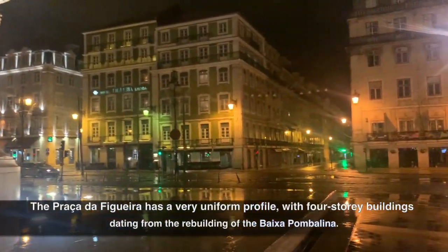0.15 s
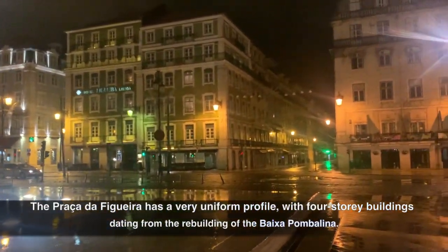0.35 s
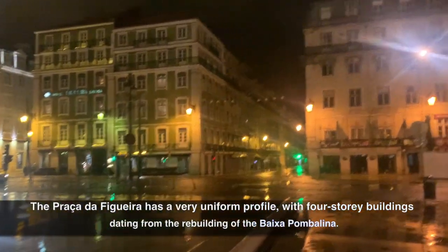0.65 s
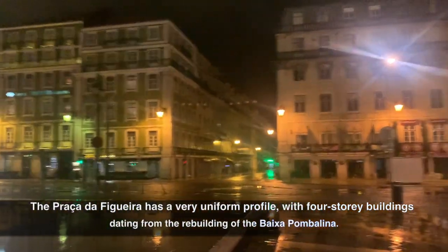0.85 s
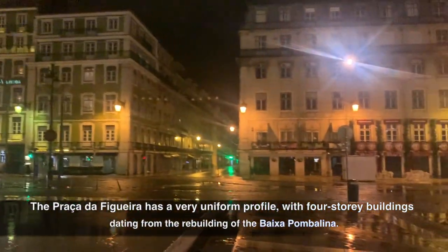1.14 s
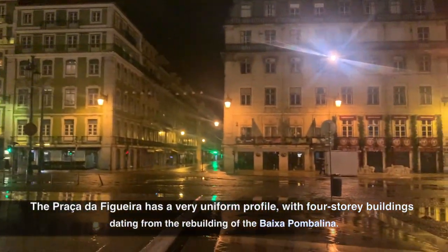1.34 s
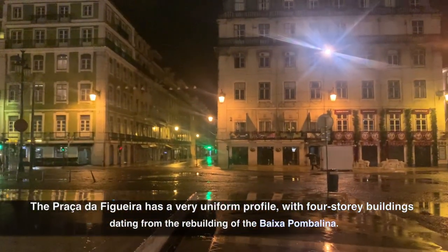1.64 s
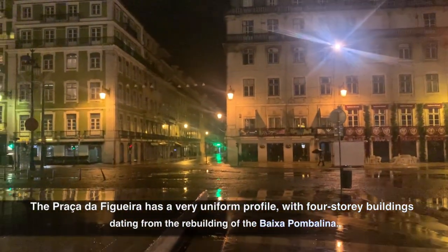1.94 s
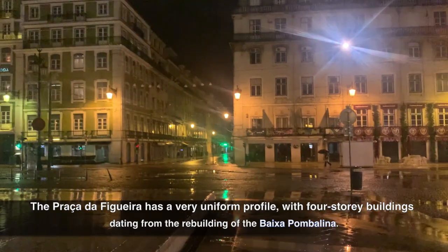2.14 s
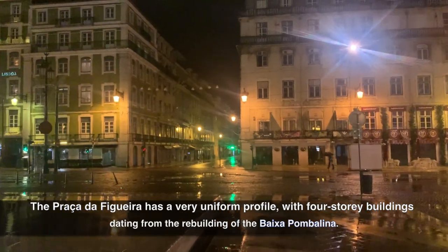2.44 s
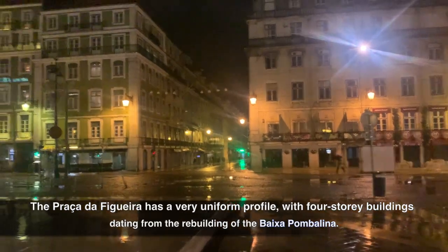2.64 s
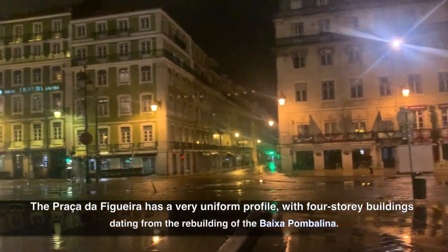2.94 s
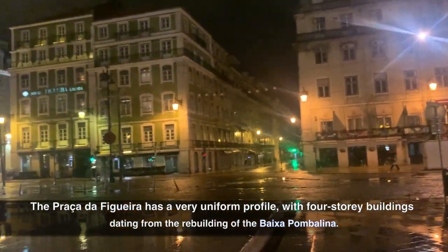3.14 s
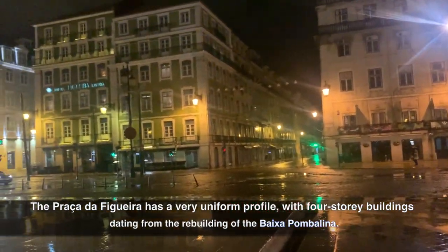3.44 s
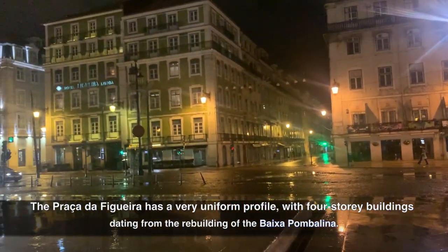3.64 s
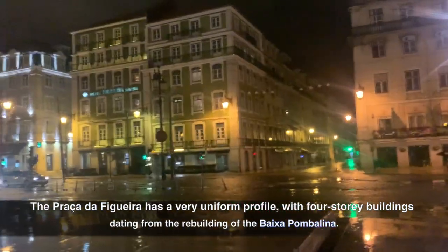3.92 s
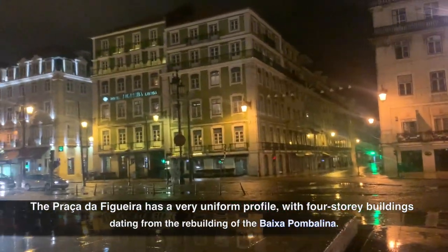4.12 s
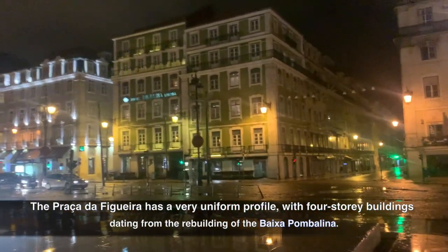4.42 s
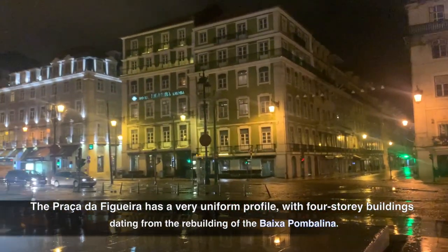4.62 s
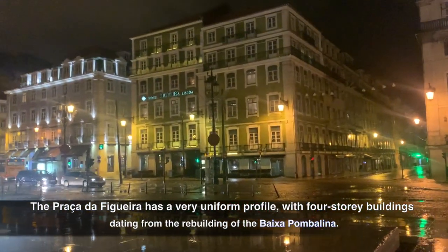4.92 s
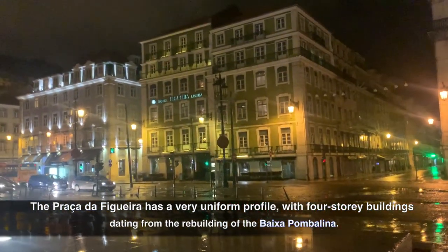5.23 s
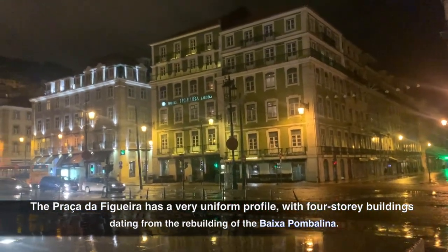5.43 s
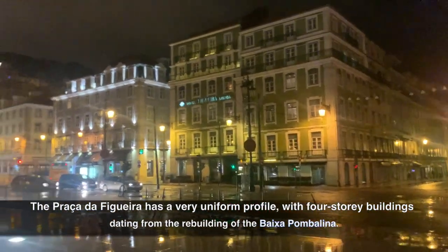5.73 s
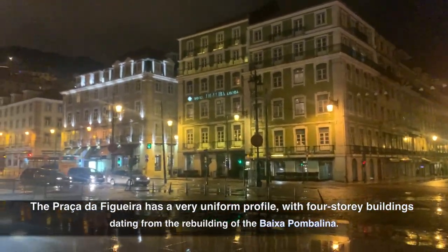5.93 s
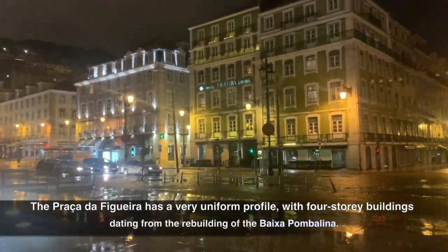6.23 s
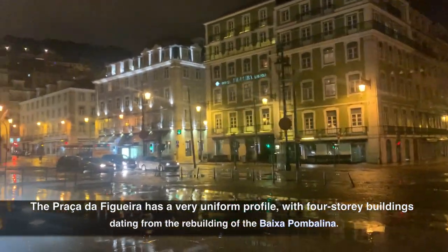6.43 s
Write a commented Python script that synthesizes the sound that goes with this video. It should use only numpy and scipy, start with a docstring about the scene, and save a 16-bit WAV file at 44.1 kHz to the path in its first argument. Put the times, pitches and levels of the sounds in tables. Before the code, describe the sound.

An open, wet square at night: distant engines drone low, tyres rush softly over paving and the wet road hisses in wide stereo. Close on the microphone, wind flutters and rumbles in short gusts, fairly mild at first, then heavier, with two violent thumps near the end and small dry pops. Faint drips and cloth rustles barely show.

```python
"""Gusty wind on a hand-held camera throughout, in a wet city square at night, over the drone of far traffic.
Wind is noise shaped by breeze and gusts; big eddies thump both ports, small pops are falling chirps.
Traffic, tyre hum, rolling and wet hiss are coloured stereo noise whose narrow bands flicker at random.
A few drips tick (bursts of narrow noise), a sleeve brushes softly (strokes of cloth noise),
and something squeaks once, very high (a slightly unsteady sine)."""
import sys
import numpy as np
from scipy import signal
from scipy.fft import rfft, irfft, next_fast_len
from scipy.io import wavfile
from scipy.ndimage import uniform_filter1d, map_coordinates

SR = 44100
rng = np.random.default_rng(int(sys.argv[2]) if len(sys.argv) > 2 else 0)


def master(y):
    """Save y as 16-bit WAV."""
    cut = np.clip(np.atleast_2d(y).T, -1, 1)
    pcm = np.round(cut * 32767)  # scale
    wavfile.write(sys.argv[1], SR, pcm.astype(np.int16))


N = 289737

# how busy the street is, as its tyre hum before the hum's own gain: t/s, level/dB
STREET_BUSY = [(0.0, -48), (0.75, -48.5), (1.66, -52), (3.3, -48.5), (5.6, -44.5), (6.17, -47.5),
               (6.45, -46)]


def amp(db):
    """Decibels to gain."""
    return 10 ** (np.asarray(db) / 20)


def unit(x):
    """Scale to rms 1."""
    return x / np.sqrt(np.mean(x ** 2) + 1e-20)


def along(points, hz):
    """Read (f/Hz, value) points on a log frequency axis."""
    f, value = np.transpose(points)
    return np.interp(np.log(hz + 1), np.log(f + 1), value)


def curves(rows):
    """One value per sample for each column after the time."""
    s, *columns = np.transpose(rows)
    return [np.interp(np.arange(N) / SR, s, column) for column in columns]


def wobble(rate):
    """A smooth random curve, rate knots a second."""
    knots = rng.standard_normal(int(N * rate / SR) + 4)
    return map_coordinates(knots, [np.arange(N) * rate / SR])


def swell(s, length):
    """A bell-shaped rise and fall around time s; length is from the top down to 1/e."""
    return np.exp(-((np.arange(N) / SR - s) / length) ** 2)


def filtered(x, response):
    """x times a response of frequency."""
    m = next_fast_len(N + 8192)
    hz = np.fft.rfftfreq(m, 1 / SR)
    return irfft(rfft(x, m) * response(hz), m)[..., :N]


def rush(spectrum, alike):
    """Stereo noise of rms 1; alike(hz) is the left-right likeness, from -1 to 1."""
    def mid_side(hz):
        turn = np.arccos(np.clip(alike(hz), -1, 1)) / 2
        return amp(along(spectrum, hz)) * [np.cos(turn), np.sin(turn)]

    mid, side = filtered(rng.standard_normal((2, N)), mid_side)
    return unit(np.array([mid + side, mid - side]))


def surge(s, length, rise_s=0.016, fall_s=0.02):
    """A gust sets in quickly at time s, holds for its length and dies away."""
    t = np.arange(N) / SR
    before = np.maximum(s - t, 0)
    after = np.maximum(t - s - length, 0)
    return np.exp(-(before / rise_s) ** 2 - after / fall_s)


def wind(lumps_db=2.6, lumps_per_s=26, flutter_db=1):
    """Gusts surge over a lumpy breeze; large eddies hit both ports, small ones flutter on each alone."""
    # colour of the buffeting at the microphone ports: f/Hz, relative level/dB per Hz
    buffet = [(10, -57), (24, -18), (37, -7.5), (55, 3), (78, -1.5), (105, -5.5), (140, -17.5), (300, -30),
              (700, -45.5), (2500, -78.5), (8000, -120)]
    # the breeze between the gusts: t/s, level/dB
    breeze_levels = [(0.0, -34.5), (0.2, -38), (0.45, -38), (0.83, -37), (1.15, -32), (1.42, -32.5),
                     (1.8, -29.5), (2.24, -31), (2.55, -28), (2.86, -33), (3.05, -26), (3.4, -37.5),
                     (3.6, -30), (3.88, -36.5), (4.1, -30), (4.19, -44), (4.3, -32), (4.94, -29),
                     (5.1, -25), (5.8, -27), (6.12, -29.5), (6.2, -25), (6.57, -36.5)]
    # gusts on the ports: start t/s, level/dB, length/s
    gust_rows = [(0.072, -31, .04), (0.638, -33, 0.13), (0.88, -35, 0.13), (1.07, -29, .06),
                 (1.165, -25, 0.046), (1.28, -29, 0.04), (1.506, -31.5, 0.072), (1.68, -29, 0.083),
                 (1.824, -23, 0.066), (1.98, -27.5, 0.062), (2.333, -24.5, .1), (2.512, -26.5, 0.062),
                 (2.945, -25, 0.097), (3.244, -24, 0.029), (3.698, -28, 0.028), (4.23, -26, 0.22),
                 (4.547, -25.5, 0.15), (4.816, -25, 0.091), (5.196, -28, 0.05), (5.31, -20, 0.13),
                 (5.484, -22.5, .08), (5.649, -21, 0.082), (5.786, -19.5, 0.12), (5.958, -19.5, 0.027),
                 (6.287, -23.5, 0.072)]
    breeze = amp(curves(breeze_levels)[0] + lumps_db * wobble(lumps_per_s))
    gusts = np.sqrt(sum((amp(db) * surge(s, length)) ** 2 for s, db, length in gust_rows))
    eddies = rush(buffet, lambda hz: along([(30, 0.75), (70, 0.5), (150, 0.68)], hz))
    # breeze and gusts alone set the slow swell of the turbulence
    power = uniform_filter1d(np.mean(eddies ** 2, axis=0), size=2000)
    eddies = eddies / np.sqrt(np.abs(power) + 1e-6)
    flutter = flutter_db * np.array([wobble(49), wobble(45)])
    return np.hypot(breeze, gusts) * amp(flutter) * eddies


def traffic(lead_s=0.00069, waver_db=0.5):
    """One engine swells and fades over the drone of far traffic; both reach the left port first."""
    # colour of the far drone: f/Hz, relative level/dB per Hz
    drone_colour = [(20, -48.5), (65, -16.5), (95, -7), (165, -0.5), (225, -3.5), (270, -5), (315, -4),
                    (380, -10), (435, -15), (490, -26), (1000, -73.5), (8000, -120)]
    # the drone of far traffic: t/s, level/dB
    far_levels = [(0, -32.5), (2.6, -30), (5.5, -31.5), (6.57, -30)]
    # colour of the engine: f/Hz, relative level/dB per Hz
    motor = [(20, -73.5), (70, -27.5), (105, 0), (135, -3), (163, -2.5), (195, -13.5), (300, -40.5),
             (3000, -120)]
    # swells of the far engine: middle t/s, level/dB, length/s
    engine_rows = [(0.606, -32.5, 1.02), (3.093, -34.5, 0.96), (4.89, -36.5, 1.64)]
    alike = lambda hz: np.full_like(hz, .96)
    drone = amp(curves(far_levels)[0] + waver_db * wobble(9.9)) * rush(drone_colour, alike)
    swells = sum(amp(db) * swell(s, length) for s, db, length in engine_rows)
    engine = swells * rush(motor, alike)
    # half the lead advances the left port, half delays the right
    ports = np.array([[1], [-1]])
    return filtered(drone + engine, lambda hz: np.exp(1j * np.pi * hz * lead_s * ports))


def rolling(level_db=-42.0, rise_db_per_s=0.06, lumps_db=2, left_db=2):
    """Tyres rush unevenly over the paving, wide, a little to the left and very slowly drawing nearer."""
    # f/Hz, relative level/dB per Hz
    colour = [(60, -70.5), (250, -22), (345, -6.5), (395, -6), (432, 2.0), (490, -1.0), (620, 0.0),
              (760, -3.0), (950, -12.5), (1600, -33.5), (12000, -120)]
    noise = rush(colour, lambda hz: np.full_like(hz, -.62))
    nearing_db = rise_db_per_s * (np.arange(N) - N / 2) / SR
    balance_db = left_db * np.array([[.5], [-.5]])
    return amp(level_db + nearing_db + lumps_db * wobble(16) + balance_db) * noise


def tyres(gain_db=2, lumps_db=1.7):
    """Tyre treads hum in a broad, flickering band near a kilohertz."""
    # f/Hz, relative level/dB per Hz
    tread = [(100, -60), (750, -19), (940, -4), (1050, 0), (1130, -.5), (1200, -5), (1300, -13),
             (2000, -45), (8000, -120)]
    hum = rush(tread, lambda hz: np.full_like(hz, .15))
    return amp(curves(STREET_BUSY)[0] + gain_db + lumps_db * wobble(16)) * hum


def wet_street(level_db=-39.0, port_delay_s=0.00044, ripple=0.23, spray_db=.7):
    """Hiss from both ends of the street; the delay between the ports ripples its likeness."""
    # colour of tyres on wet stone: f/Hz, relative level/dB per Hz
    hiss_colour = [(120, -16), (400, -11), (680, -5.5), (900, -3.5), (1350, -8), (2050, -10), (2500, -13.5),
                   (3500, -16), (4500, -17.5), (5400, -21), (6700, -24.5), (8000, -32), (9500, -42.5),
                   (14500, -89)]
    # stereo image of the hiss before the ripple: f/Hz, left-right likeness
    hiss_alike = [(200, -1.5), (450, 0.66), (750, -.5), (1200, -0.45), (1700, -0.21), (2200, 0.21),
                  (3200, -0.07), (9000, 0)]
    # stereo tilt of the hiss: f/Hz, left minus right/dB
    hiss_balance = [(300, -3), (700, 4), (1500, 0), (4600, 1.5), (6300, 0.5), (8200, -8.5), (9800, 2)]
    hiss_follows, spray_follows = 0.36, 0.27  # dB for each dB of tyre hum
    busy_db, = curves(STREET_BUSY)
    busy_db = busy_db - busy_db.mean()
    alike = lambda hz: along(hiss_alike, hz) + ripple * np.cos(2 * np.pi * hz * port_delay_s)
    tilt = lambda hz: amp(along(hiss_balance, hz) * np.array([[.5], [-.5]]))
    hiss = filtered(rush(hiss_colour, alike), tilt)
    # the fine spray, mostly above 3.5 kHz, comes and goes on its own
    spray = filtered(hiss, lambda hz: 1 - 1 / (1 + (hz / 3500) ** 4))
    coarse = (hiss - spray) * amp(hiss_follows * busy_db)
    fine = spray * amp(spray_follows * busy_db + spray_db * wobble(20))
    return amp(level_db) * (coarse + fine)


def patchy_bands(x):
    """Narrow bands swell and drop out for a moment at random."""
    # depth of random flicker: f/Hz, depth/dB
    flicker = [(100, 1), (280, 2.0), (500, 3.5), (800, 3.3), (1150, 2.6), (2000, 2.9), (4000, 2.2),
               (8000, 1.9)]
    hz, _, z = signal.stft(x, SR, nperseg=1024)
    field = rng.standard_normal(z.shape[1:])
    field = uniform_filter1d(field, size=2, axis=0)
    field = uniform_filter1d(field, size=7, axis=1)
    # the colour shifts more than the loudness
    field = field - .5 * uniform_filter1d(field, size=9, axis=0)
    gain = amp(along(flicker, hz)[:, None] * unit(field))
    gain = gain / np.sqrt(np.mean(gain ** 2, axis=1, keepdims=True))
    return signal.istft(z * gain, nperseg=1024)[1][:, :N]


def drips(gain_db=-2.0, attack_s=0.001, t60_s=.045, spread=.17):
    """Each drop splashes on stone: a short spray around its own pitch."""
    # drips: t/s, level/dB before the gain, f/Hz
    drip_rows = [(0.187, -43, 6800), (1.172, -44, 6800), (1.988, -35, 6500), (2.108, -45, 6600),
                 (2.778, -40, 6200), (2.861, -38.5, 5800)]
    out, t = np.zeros((2, N + SR)), np.arange(SR // 8) / SR
    hz = np.fft.rfftfreq(len(t), 1 / SR)
    for s, db, pitch_hz in drip_rows:
        band = np.exp(-.5 * (np.log((hz + 1) / pitch_hz) / spread) ** 2)
        noise = rng.standard_normal((2, len(t)))
        spray = unit(irfft(rfft(noise) * band, len(t)))
        envelope = amp(db + gain_db - 60 * t / t60_s) * (1 - np.exp(-t / attack_s))
        out[:, round(s * SR):][:, :len(t)] += envelope * spray
    return out[:, :N]


def sleeve(grain_db=3.5):
    """Cloth slides in soft, uneven strokes of coloured noise."""
    # strokes of the sleeve: middle t/s, level/dB, length/s
    stroke_rows = [(0.693, -51.5, 0.037), (2.66, -54, 0.052), (2.765, -48, .045), (3.04, -51, 0.11),
                   (3.162, -48.5, 0.05), (3.274, -51, 0.055)]
    # f/Hz, relative level/dB per Hz
    colour = [(200, -86), (1500, -23.0), (4000, 5.0), (7200, 0.5), (8500, -12), (10000, -28), (15000, -83)]
    cloth = filtered(rng.standard_normal((2, N)), lambda hz: amp(along(colour, hz)))
    strokes = sum(amp(db) * swell(s, length) for s, db, length in stroke_rows)
    return strokes * unit(amp(grain_db * wobble(35)) * cloth)


def pops(cycles=1.61):
    """An eddy knocks in the ports: treble first, heavier bass milliseconds behind, then it stops dead."""
    # eddies popping: t/s, envelope peak level/dB, starting f/Hz, time to the peak/s
    pop_rows = [(0.8036, -23, 1750, .0032), (4.4655, -22, 1600, .003), (5.9662, -26, 1700, .0013),
                (5.9945, -25, 2100, .0022), (6.0341, -21, 3300, .0026), (6.457, -24.5, 1200, .003)]
    out, t = np.zeros(N + SR), np.arange(SR // 20) / SR
    for s, db, start_hz, peak_s in pop_rows:
        # the pitch falls from start_hz; cycles sets how slowly
        phase = 2 * np.pi * cycles * np.log1p(t * start_hz / cycles)
        shape = np.sqrt(t / peak_s * np.exp((1 - (t / peak_s) ** 3) / 3))
        out[round(s * SR):][:len(t)] += amp(db) * np.sin(phase) * shape
    return out[:N]


def thumps(rebound=.15):
    """A large eddy passes: one deep drop of pressure between two smaller rises, the second the stronger."""
    # the largest eddies, on both ports at once: middle t/s, peak level/dB, half length/s
    thump_rows = [(1.333, -19, .0045), (1.899, -18, .0048), (2.345, -15.5, .005), (2.424, -15.5, .0052),
                  (2.948, -18, .0058), (3.272, -15, .0042), (4.852, -18, .0048), (5.214, -17, .0044),
                  (5.386, -4.5, .0037), (5.425, -11, .004), (5.846, -5.5, .0041), (5.881, -9.5, .0034),
                  (5.969, -18, .0044), (6.045, -17, .0038), (6.296, -16, .0046)]
    t, out = np.arange(N) / SR, np.zeros(N)
    for s, db, width in thump_rows:
        u = (t - s) / width
        out -= amp(db) * (1 - 2 * u ** 2) * (1 + rebound * u) * swell(s, width)
    return out


def squeak(s=3.74, pitch_hz=13430, db=-64, length=.04):
    """One thin, faint squeak: a sine whose pitch trembles slightly."""
    phase = 2 * np.pi * np.cumsum(pitch_hz + 25 * wobble(80)) / SR
    return amp(db) * swell(s, length) * np.sin(phase)


def scene():
    """Wind on the ports over the sounds of the square."""
    ports = wind() + thumps() + pops()
    square = patchy_bands(traffic() + rolling() + tyres() + wet_street())
    return ports + square + drips() + sleeve() + squeak()


def record(dry, low_cut_hz=27, top_hz=14900):
    """The camera adds a trace of its own hiss, cuts the deepest bass and all above its band limit."""
    self_noise = amp(-75) * rng.standard_normal((2, N))
    band = lambda hz: (hz < top_hz) * (1 - 1 / (1 + (hz / low_cut_hz) ** 4))
    return filtered(dry + self_noise, band)


dry = scene()
out = record(dry)
master(out)
```